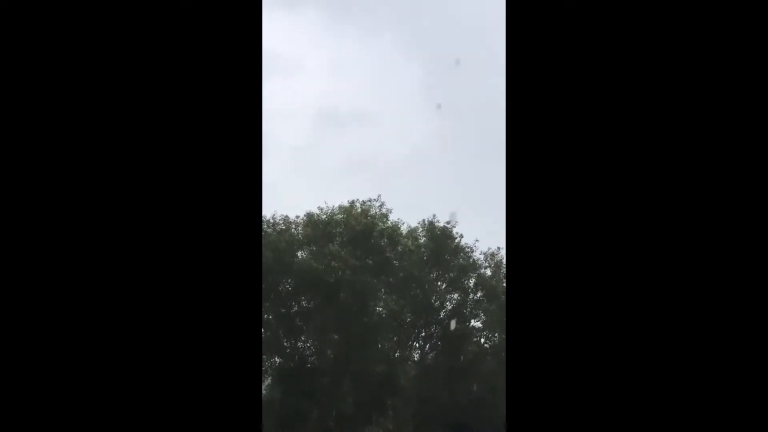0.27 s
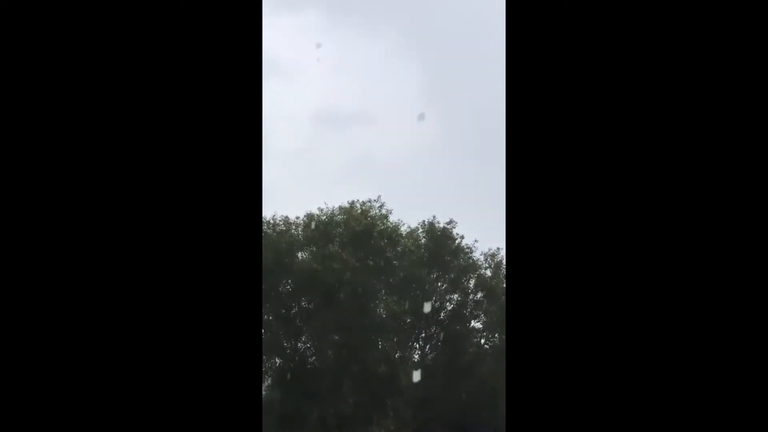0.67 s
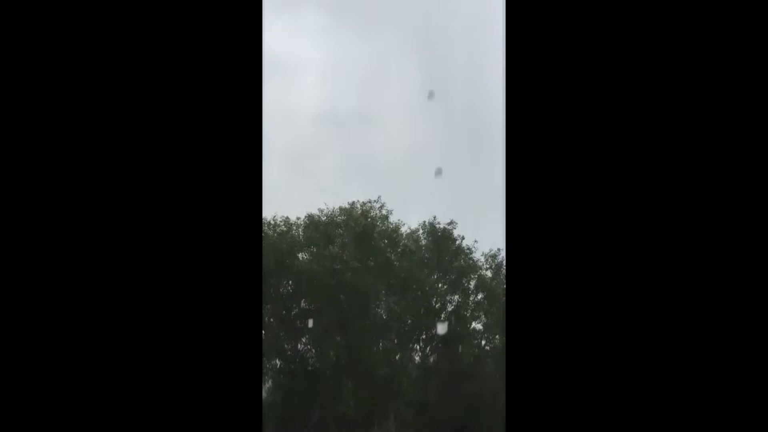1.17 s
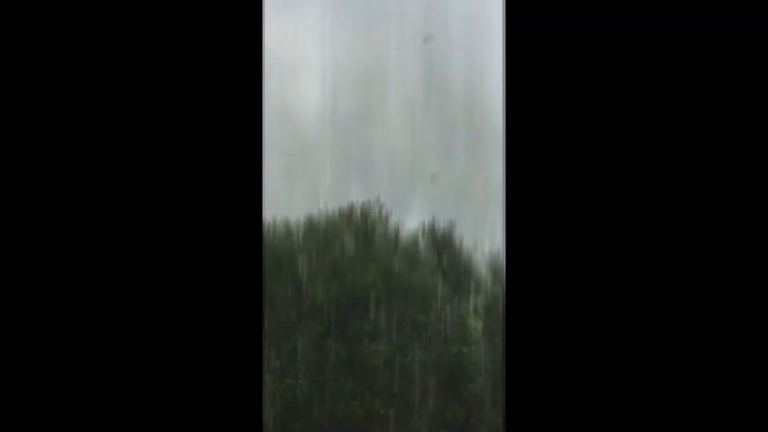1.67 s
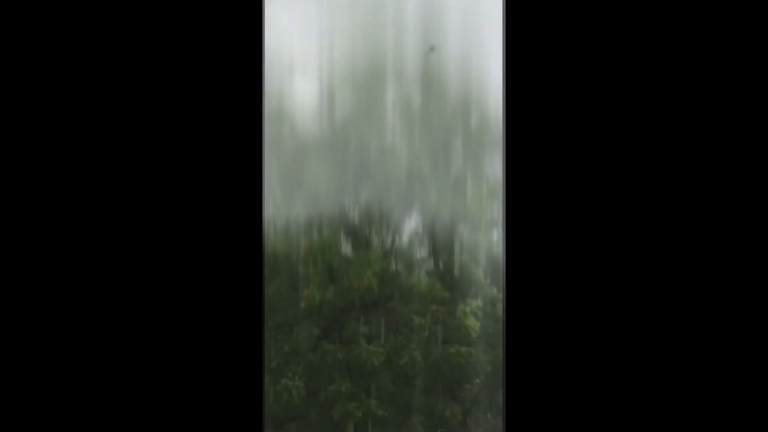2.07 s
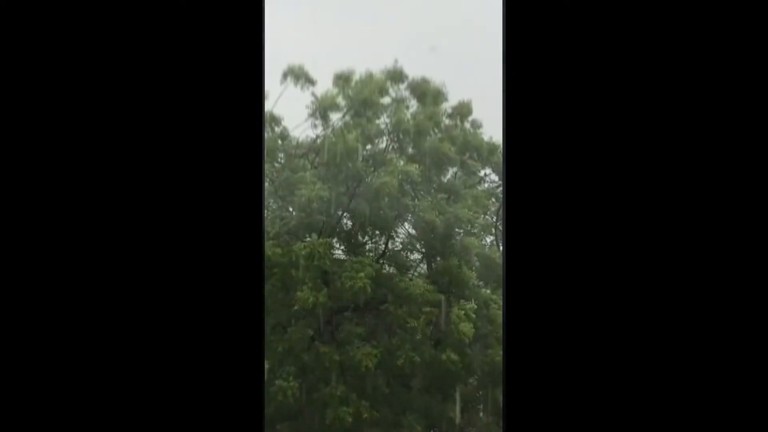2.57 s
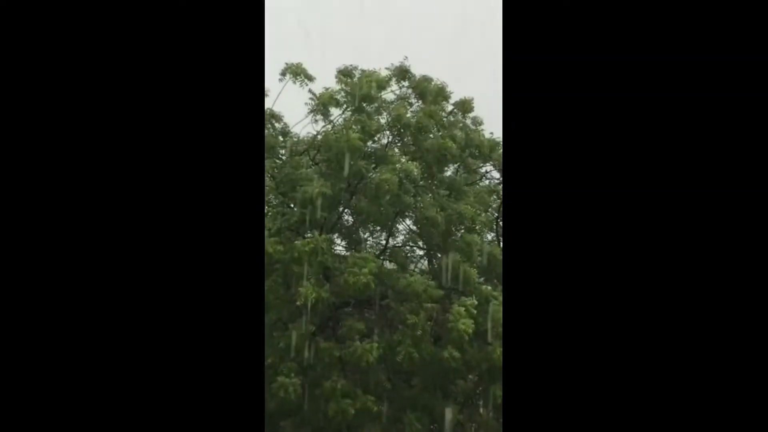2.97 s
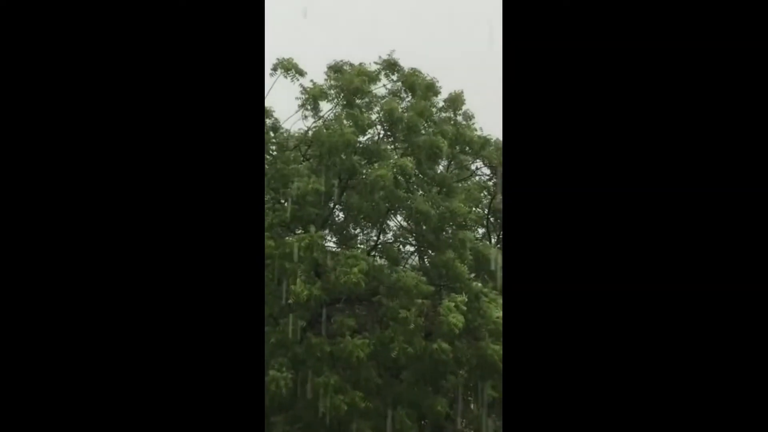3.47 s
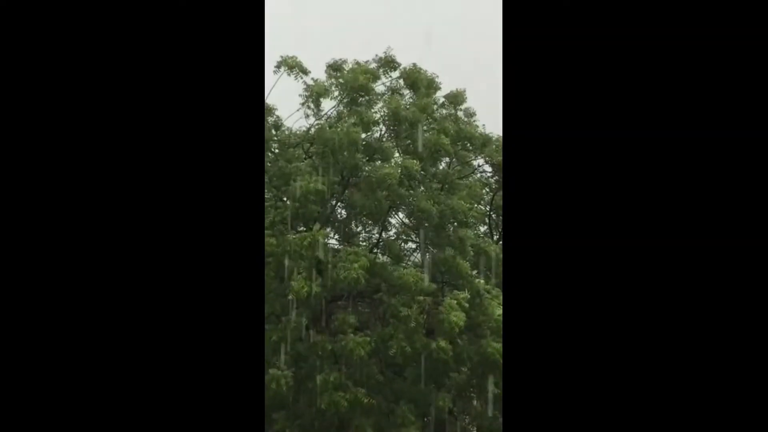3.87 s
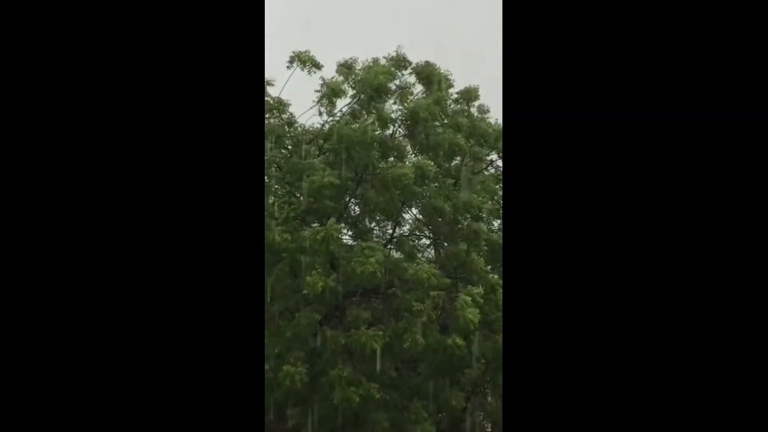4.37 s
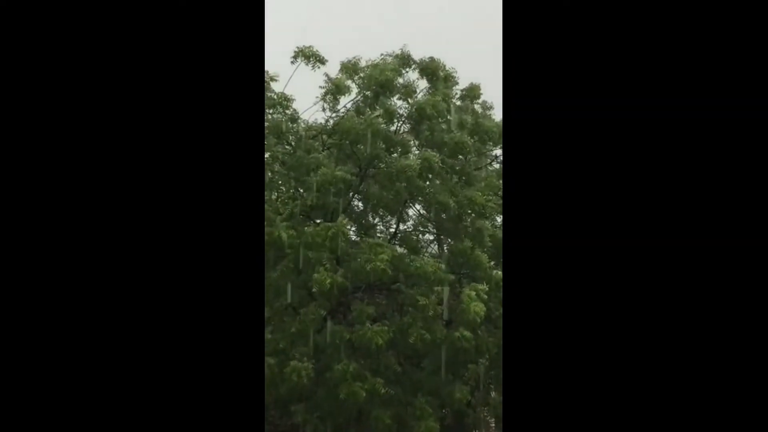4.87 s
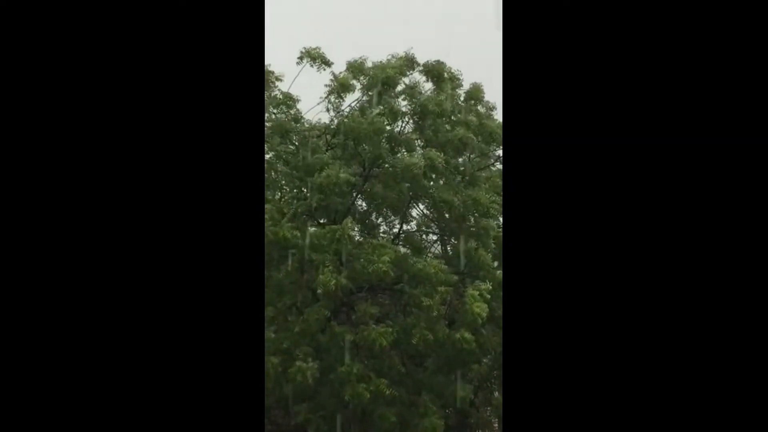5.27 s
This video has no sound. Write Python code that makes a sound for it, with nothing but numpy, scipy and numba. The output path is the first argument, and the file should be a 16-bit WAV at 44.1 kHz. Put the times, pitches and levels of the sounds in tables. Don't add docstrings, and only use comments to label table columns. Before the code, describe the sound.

Muffled steady rain on trees cuts to brief silence, then returns louder and brighter with sharp close drips snapping and splashing until the end.

```python
import sys
import numpy as np
from scipy import signal
from scipy.fft import rfft, irfft
from scipy.io import wavfile
from scipy.ndimage import uniform_filter1d
from numba import njit

SR = 44100
rng = np.random.default_rng(int(sys.argv[2]) if len(sys.argv) > 2 else 0)


def master_out(mix):
    frames = np.transpose(np.atleast_2d(mix))
    ceiling = np.clip(frames, -1, 1)
    pcm = np.round(ceiling * 32767).astype(np.int16)
    wavfile.write(sys.argv[1], SR, pcm)


def natural_amplitude(level_db):
    exponent = np.asarray(level_db, float) / 20
    return 10 ** exponent


N = 243873

# start/s, end/s
SHOTS_S = [
    (0, 1.778),
    (2.072, 5.53),
]
TOPS_HZ = [12650, 15800]


def walk(size, rate_hz):
    hold = int(SR / rate_hz)
    held = np.repeat(rng.standard_normal(size // hold + 1), hold)
    return 1.1 * uniform_filter1d(uniform_filter1d(held, hold), hold)[:size]


@njit
def add(out, start, hz, turns, size, phase):
    for k in range(len(start)):
        spread = turns[k] * SR / hz[k] / 2
        first = max(0, int(start[k] - 3 * spread))
        last = min(len(out), int(start[k] + 3 * spread) + 1)
        for i in range(first, last):
            d = i - start[k]
            bell = np.exp(-(d / spread) ** 2)
            out[i] += size[k] * bell * np.cos(2 * np.pi * hz[k] * d / SR + phase[k])


def grains(s, hz, turns, db, chance):
    out = np.zeros(N)
    hz = np.clip(hz + 0 * s, 20, .4 * SR)
    turns = np.clip(turns, .3, 30) + 0 * s
    add(out, s * SR, hz, turns, natural_amplitude(db), 2 * np.pi * chance)
    return out


def wash(curve, colour, top_hz, gust_db, patchy_db, flicker_db):
    drum_follows, spray_follows = 0.53, 0.75
    t = np.arange(N) / SR
    s, body_db, near_db = np.transpose(curve)
    colour_hz, colour_db = np.transpose(colour)
    f = np.fft.rfftfreq(N, 1 / SR) + 1
    shape = natural_amplitude(np.interp(np.log(f), np.log(colour_hz), colour_db)) * (f < top_hz)
    body = np.sqrt(2 * np.sum(shape[(f > 800) & (f < 2500)] ** 2) / N)
    noise = rfft(rng.standard_normal(N)) * shape / body

    zones_db = np.outer([drum_follows, 0, 1, spray_follows], near_db)
    zones_hz = np.log([400, 1500, 5000, 11000])
    gust, patch, out = walk(N, 22), walk(N, 24), 0
    for hz in 25 * 2 ** (np.arange(29) / 3):
        band = irfft(noise * np.clip(1 - 3 * abs(np.log2(f / hz)), 0, 1), N)
        weights = [np.interp(np.log(hz), zones_hz, one) for one in np.eye(4)]
        db = np.interp(t, s, body_db + np.dot(weights, zones_db))
        patch = .8 * patch + .6 * walk(N, 24)
        near = np.clip(np.log2(hz / 700) / 5.1, .15, 1)
        swell_db = gust_db * gust + patchy_db * patch + flicker_db * walk(N, 90)
        out = out + band * natural_amplitude(db + near * swell_db)
    return out, np.interp(t, s, body_db)


def patter(count, level_db, scatter_db, hz, spread_oct, turns):
    when, pitch, size, phase = rng.random((count, 4)).T
    tick_hz = hz * 2 ** (spread_oct * (2 * pitch - 1))
    db = level_db - scatter_db * np.log(size + 0.0046)
    return grains(when * N / SR, tick_hz, turns, db, phase)


def drips(rows, crack_rel_db, splash_ratio, spread_oct):
    count, lag_s, spread_s, fade_db, fizz_turns = 120, .0035, .036, 13.0, 4.85
    s, snap_db, snap_hz, splash_db = np.transpose(rows)[:, :, None]
    crack_db = snap_db + crack_rel_db
    chance = rng.random((len(rows), 2 + 4 * count))

    hit_s, hit_hz, hit_db = s[:, 0], snap_hz[:, 0], snap_db[:, 0]
    snap = grains(hit_s, hit_hz, 1.6, hit_db - 1.5, chance[:, 0])
    weight = grains(hit_s, .5 * hit_hz, 1, hit_db - 15, chance[:, 1])
    crack = grains(hit_s, 12000, 2, crack_db[:, 0] - 2, chance[:, 1])

    when, pitch, size, phase = np.split(chance[:, 2:], 4, axis=1)
    late = when ** 1.3
    db = splash_db - 0.5 - fade_db * late - 3.2 * np.log(size + 0.1)
    hz = snap_hz * splash_ratio * 2 ** (spread_oct * np.log(pitch / (1 - pitch)))
    spray_s = s + lag_s + spread_s * late
    spray = grains(spray_s.ravel(), hz.ravel(), fizz_turns, db.ravel(), phase.ravel())

    mist_s, mist_hz = s + 0.0018 + .024 * size, 9700 + 6000 * phase
    mist_db = crack_db - 28.5 - 7.1 * size
    mist = grains(mist_s.ravel(), mist_hz.ravel(), 6.4, mist_db.ravel(), when.ravel())
    return snap + weight + crack + spray + mist


def strays(count):
    when, pitch, wet = rng.random((count, 3)).T
    snap_db = np.full(count, -20.0)
    snap_hz = 5600 * 2 ** (.4 * (2 * pitch - 1))
    splash_db = snap_db - 25 + 4 * (2 * wet - 1)
    return np.transpose([when * N / SR, snap_db, snap_hz, splash_db])


def close_drips():
    # t/s, snap peak level/dB, snap f/Hz, splash level/dB
    stone_rows = [(.1378, -17, 4140, -39), (.4127, -15, 5140, -39), (.666, -7.5, 5600, -36),
                  (.7355, -15.5, 4820, -42), (.6412, -22, 4660, -47), (.7684, -18, 7370, -43.5),
                  (2.4165, -26, 9000, -44), (1.53, -21, 5310, -42), (1.751, -18, 6580, -43),
                  (2.169, -28, 3530, -38.5), (2.6171, -19, 6070, -34), (2.7856, -5, 6150, -32),
                  (2.917, -19, 6440, -48), (2.9961, 4, 5700, -27.5), (2.9999, -9, 5620, -32),
                  (3.0666, -1.5, 6650, -30), (3.2095, -6, 5500, -36), (3.4, -15, 4410, -34),
                  (3.454, -8, 4400, -28), (3.5946, -14.5, 6080, -37), (3.7557, -2.5, 6800, -29),
                  (3.8447, -18, 4980, -33), (4.6356, -7, 5280, -41), (4.9736, -19, 5900, -41),
                  (4.9979, -5, 6600, -29.5), (5.0025, -12, 7050, -35), (5.3171, -12, 5200, -38),
                  (5.41, 1, 4940, -31)]
    # t/s, snap peak level/dB, snap f/Hz, splash level/dB
    puddle_rows = [(.3312, -16, 5400, -43), (.4866, -11, 4970, -41), (.8, -25, 7110, -37),
                   (1.3335, -26, 5460, -41), (2.684, -26, 4300, -38), (2.9635, -2.5, 7730, -36),
                   (3.4763, -8.5, 3950, -34), (3.5226, -10, 5450, -42), (3.6997, -9, 5830, -31),
                   (3.8672, -3, 4810, -33), (3.8764, -18, 4440, -41), (3.898, -5.5, 7500, -32.5),
                   (3.91, -7, 4760, -34), (3.9732, -11, 7600, -45), (4.1364, -12, 6000, -38),
                   (4.152, -15, 4900, -32), (4.171, -16, 5480, -31), (4.196, -7, 7920, -33),
                   (4.7334, -7, 3680, -31), (4.7402, -15.5, 4200, -35), (4.8667, -4, 4150, -31),
                   (4.993, -5.5, 4380, -32), (5.0811, -10.5, 5040, -38), (5.1042, -12, 6480, -42),
                   (5.141, -16, 7300, -33), (5.2907, -10.5, 5400, -30.5), (5.3998, 4, 6000, -25.5),
                   (5.4133, -13, 5250, -39), (5.502, -6, 3790, -30), (5.5074, -9, 3830, -33)]
    # t/s, snap peak level/dB, snap f/Hz, splash level/dB
    leaf_rows = [(.0237, -17, 6930, -29.5), (1.0101, -19, 3900, -35), (2.9067, -3, 6540, -28),
                 (3.1357, -7, 7620, -30), (3.6034, -20, 6590, -42), (3.647, -11, 4660, -33),
                 (4.0889, -10, 5330, -29.5), (4.4199, -8, 7090, -43), (4.5285, -13, 7800, -40),
                 (4.6653, -8.5, 6800, -27), (4.849, -10, 7910, -41.5), (4.8873, -15, 6940, -32),
                 (5.1926, -17, 6500, -27.5), (5.2002, -2, 8330, -34.5), (5.249, -1.5, 8050, -33),
                 (5.418, -10, 6050, -30)]
    stone = drips(stone_rows, crack_rel_db=-3, splash_ratio=1.1, spread_oct=.27)
    leaf = drips(leaf_rows, crack_rel_db=1, splash_ratio=1.5, spread_oct=.25)
    puddle, stray = (drips(rows, crack_rel_db=-12.5, splash_ratio=1.02, spread_oct=.17)
                     for rows in (puddle_rows, strays(count=24)))
    return stone + puddle + leaf + stray


def knocks():
    # t/s, level/dB, f/Hz, length/turns
    bumps = [
        (1.451, -23, 1900, 3),
        (3.006, -52, 75, .9),
        (3.116, -57, 65, .9),
        (5.0, -60, 55, .9),
    ]
    s, db, hz, turns = np.transpose(bumps)
    return grains(s, hz, turns, db, 0 * s)


def scene():
    # t/s, body level/dB, nearness (leaf hiss and spray over body)/dB
    shower = [
        [(0, -38.5, -0.5), (.5, -39.5, 2), (.75, -40, 3.5), (.95, -37.5, -3.5), (1.2, -41.5, 3.5),
         (1.45, -42, 1.5), (1.778, -43.5, -0.5)],
        [(2.1, -38, -2.5), (2.3, -35.5, -5.5), (2.63, -36.5, 0.5), (2.9, -35, 1.5), (3.17, -34, -2),
         (3.4, -35, 1.5), (3.95, -34, -1.5), (4.3, -34.5, 0.5), (4.67, -35.5, 2.5), (5.0, -34.5, 0.5),
         (5.53, -36, 2)],
    ]
    # f/Hz, level/dB
    colour_first = [(30, -43), (65, -37), (167, -4.5), (235, -0.5), (519, -5), (625, -2.5), (858, -8),
                    (1210, -3.5), (2050, -6.5), (4290, -7), (11100, -11), (12500, -15), (12750, -75)]
    # f/Hz, level/dB
    colour_second = [(30, -51), (91, -20), (181, -1), (305, 1.5), (455, -3), (593, -4.5), (881, -6.5),
                     (1420, -2.5), (2400, -7), (5300, -8.5), (9500, -13), (9800, -19), (12000, -13.5),
                     (15700, -17)]
    first, first_db = wash(shower[0], colour_first, TOPS_HZ[0],
                           gust_db=-0.6, patchy_db=1.64, flicker_db=4.5)
    second, second_db = wash(shower[1], colour_second, TOPS_HZ[1],
                             gust_db=-1.0, patchy_db=3.5, flicker_db=3.0)
    later = np.arange(N) / SR > SHOTS_S[0][1]
    ticks = patter(count=3000, level_db=1.5, scatter_db=3.0, hz=4860, spread_oct=1.3, turns=1.7)
    ticks = ticks * natural_amplitude(np.where(later, second_db, first_db + 0.5))
    rain = np.where(later, second, first) + ticks + close_drips() + knocks()
    return np.array([rain, rain])


def coarsen(x, local, nearby_lines):
    # centre t/s, rounding step over the usual line level/dB
    coarse_frames = [(0.96, 10), (1.496, 9), (2.24, 9.5), (2.704, 9), (3.354, 9), (3.678, 9.5),
                     (3.724, 7.5), (3.797, 13), (4.119, 8.5), (4.284, 10.5), (4.33, 10), (5.02, 11),
                     (5.327, 10.5)]
    frame = 2048
    n, k = np.arange(frame), np.arange(frame // 2)[:, None]
    window = np.sin(np.pi * (n + .5) / frame) * 2 / np.sqrt(frame)
    basis = np.cos(2 * np.pi / frame * (k + .5) * (n + .5 + frame / 4)) * window
    out = x.copy()
    for s, step_db in coarse_frames:
        span = slice(int(s * SR) - frame // 2, int(s * SR) + frame // 2)
        lines = basis @ out[span]
        power = uniform_filter1d(lines ** 2, nearby_lines) + 1e-18
        usual = np.sqrt(power ** local * np.median(power[40:420]) ** (1 - local))
        step = natural_amplitude(step_db) * usual
        rounded = np.sign(lines) * step * np.floor(abs(lines) / step + .4054)
        rounded[:24] = lines[:24]
        out[span] += (rounded - lines) @ basis
    return out


def roll_off(x):
    return signal.sosfilt(signal.butter(12, 17020, fs=SR, output="sos"), x)


def record(dry):
    t = np.arange(N) / SR
    rain = coarsen(.98 * np.tanh(dry[0]), local=.72, nearby_lines=60)
    first, second = (signal.sosfiltfilt(signal.ellip(8, .1, 40, hz, fs=SR, output="sos"), rain)
                     for hz in TOPS_HZ)
    cut_s, resume_s = SHOTS_S[0][1], SHOTS_S[1][0]
    tail = natural_amplitude(-25.5 - 1400 * np.clip(t - cut_s, 0, 1)) * (t < cut_s + .04)
    gate = uniform_filter1d(np.where(t < cut_s, 1, tail), size=16)
    fade = np.clip((t - resume_s) / 0.026, 0, 1) ** 0.65
    joined = first * gate + second * fade
    return roll_off(np.array([joined, joined]))


dry = scene()
out = record(dry)
master_out(out)
```